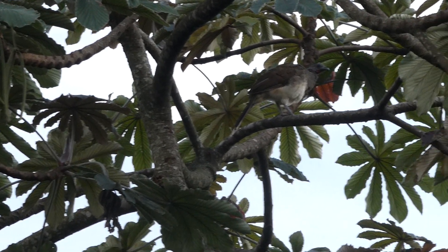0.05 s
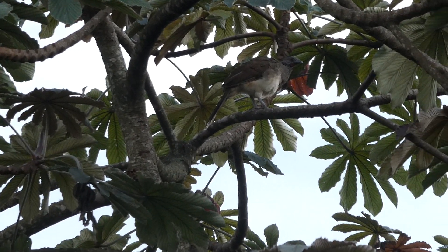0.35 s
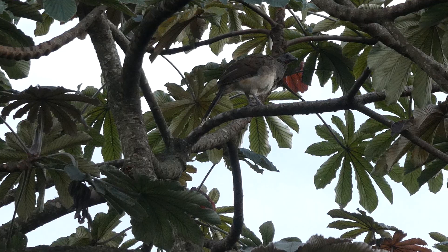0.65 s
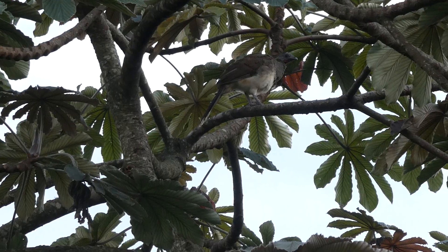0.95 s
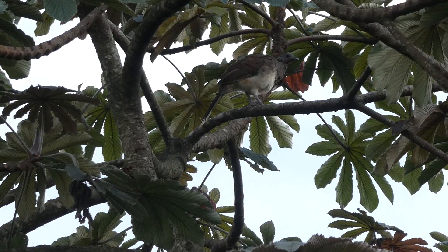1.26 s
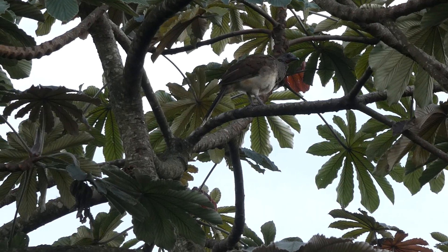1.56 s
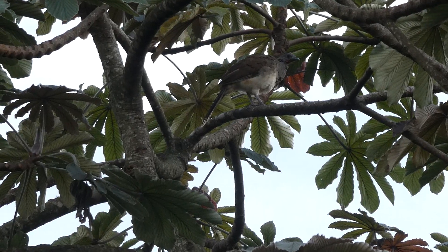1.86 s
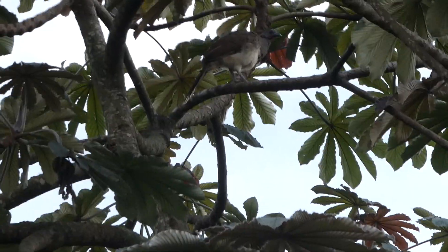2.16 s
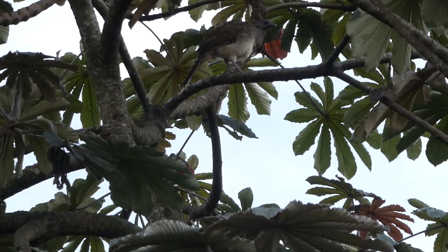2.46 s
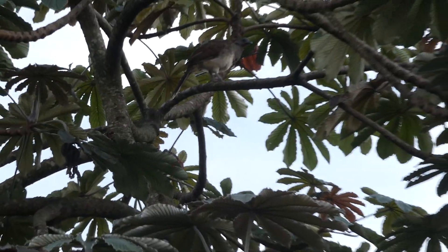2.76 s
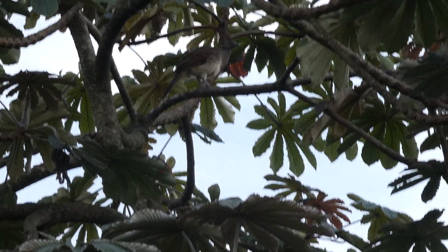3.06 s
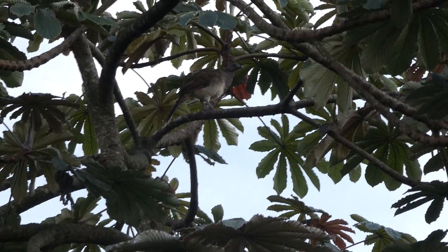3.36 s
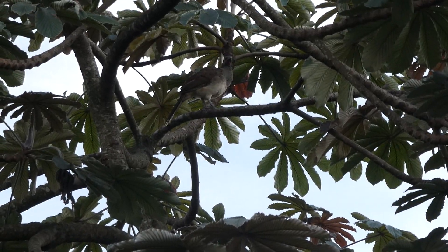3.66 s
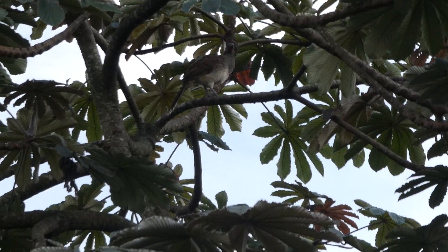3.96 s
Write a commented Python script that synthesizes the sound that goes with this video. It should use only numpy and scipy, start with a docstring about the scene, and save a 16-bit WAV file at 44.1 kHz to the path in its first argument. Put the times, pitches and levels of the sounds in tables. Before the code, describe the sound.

Chachalacas call in a leafy tree: one repeats squeaky whistles ending in harsh downward slurs while another adds short rasps. Leaves rustle now and then over distant rumble and hiss, and something clicks near the microphone at the end.

```python
"""Chachalacas in a leafy tree, heard in stereo over a low distant rumble and a hiss of air.
One bird opens with a short rasp and puts in more between and over another's ten calls. Each call starts
with a thin squeak, drops to a whistle, often long and sagging, and ends in a harsh downward slur; the
foliage scatters it. Early on a farther bird gives one thin note; then leaves rustle and twigs tick now
and then. Just before the end something clicks close to the microphone."""
import sys
import numpy as np
from scipy import signal
from scipy.io import wavfile

SR = 44100
rng = np.random.default_rng(int(sys.argv[2]) if len(sys.argv) > 2 else 0)


def file_out(sig):
    """Save sig as 16-bit WAV at sys.argv[1]."""
    # one column per channel
    cols = np.atleast_2d(sig).T
    # limit, then scale
    lim = np.clip(cols, -1, 1)
    pcm = np.round(lim * 32767).astype(np.int16)
    wavfile.write(sys.argv[1], SR, pcm)


N = 176400
T = np.arange(N) / SR

# body of each call: (time [s], length [s], top pitch [Hz], end pitch [Hz], sag exponent, scoop [Hz],
# fundamental [dB], octave [dB], third partial [dB], change of the fundamental over the note [dB],
# roughness, slur length [s], slur level [dB]); a higher sag exponent holds the pitch longer
WHISTLES = [(0.227, 0.23, 3500, 3206, 2.7, 162, -53, -46.5, -61, -1, 0.47, 0.051, -38),
            (0.649, 0.034, 2760, 2680, 1.52, 10, -61, -40, -59, 13, 0.43, 0.037, -42.5),
            (.864, 0.2, 3615, 3227, 1.6, 130, -49.5, -53, -66.5, -6, 0.584, .052, -44),
            (1.251, 0.038, 3310, 2977, 1.4, 3, -56, -48.5, -71, 4, 0.46, 0.064, -43),
            (1.488, 0.212, 3578, 3237, 1.7, 130, -52, -53.5, -69.5, 0, 0.55, 0.055, -42.5),
            (1.973, 0.24, 3650, 3285, 2.1, 136, -50, -53.5, -71, -8, 0.56, 0.049, -43),
            (2.409, .225, 3388, 3215, 1.6, 4, -55.5, -55.5, -73, 2, 0.53, .052, -44.5),
            (2.813, 0.039, 3449, 2945, 1.48, 3, -52, -51.5, -65, -4.5, 0.5, 0.056, -42.5),
            (3.077, .192, 3784, 3274, 1.3, 1, -41, -49.5, -64, -18, .39, 0.034, -40.5),
            (3.648, 0.17, 3790, 3220, 1.3, 0, -45, -51.5, -65.5, -15.5, 0.48, 0.024, -57)]
# start of each call: (time [s], length [s], first pitch [Hz], settled pitch [Hz], level [dB], roughness)
SQUEAKS = [(0.207, 0.028, 6460, 4880, -39, 1.23), (0.621, 0.034, 4980, 4360, -38.5, 0.48),
           (0.85, 0.026, 5353, 4610, -43, 0.7), (1.236, 0.032, 5270, 4550, -43.5, 0.8),
           (1.477, 0.048, 5400, 4620, -42.5, 0.7), (1.955, 0.0412, 5430, 4610, -43, 0.86),
           (2.355, 0.026, 4520, 4154, -49, 0.75), (2.790, 0.032, 4850, 4280, -38, 0.76),
           (3.028, 0.061, 4810, 4475, -36.5, 0.34), (3.593, 0.0226, 5950, 5200, -44.5, 0.92),
           (3.607, 0.05, 5020, 4570, -36.5, 0.52)]
# the second bird: (time [s], length [s], top pitch [Hz], level [dB], roughness)
RASPS = [(0.02, 0.076, 2352, -45.5, 0.55), (0.398, 0.057, 2410, -45.5, 0.89),
         (0.882, .105, 2301, -50.5, 1.13), (1.518, 0.1, 2298, -48, 1.42), (2.378, 0.089, 2414, -46, 1.2)]
# harmonics of each kind of note, from the fundamental up: (relative level [dB])
SLUR_PARTIALS_DB = [-20.5, -4, -10.5, -27, -33, -30.5, -52]
SQUEAK_PARTIALS_DB = [-3.5, -20, -38]
RASP_PARTIALS_DB = [-12, -1, -15.5, -22, -38]
# leaves and twigs: (time [s], decay [s], level [dB], low edge [Hz], high edge [Hz])
RUSTLES = [(0.836, 0.14, -44, 298, 5400), (.868, 0.035, -46.5, 302, 2210), (1.69, .006, -40, 1000, 3480),
           (2.49, 0.0038, -38, 890, 3500), (2.575, 0.0033, -52, 4000, 11000),
           (3.421, 0.0099, -44, 1370, 4440), (3.432, 0.0028, -42, 1200, 4200),
           (3.466, 0.0059, -50, 2000, 5350), (3.487, .006, -50, 1510, 4470)]
# ringing of the close click: (frequency [Hz], relative level [dB], time to fall 60 dB [s])
CLICK_MODES = [(1478, -0.5, 0.027), (1960, -6, 0.0178), (3620, -9, 0.027), (6500, -0.5, 0.0073),
               (7200, -1, .005), (10160, 2.5, .004), (13700, -5, .004)]
# colour of the distant rumble and the air: (frequency [Hz], relative density [dB])
RUMBLE_SPECTRUM = [(30, -37.5), (48, -19), (68, -13), (90, -12.5), (140, -9), (220, 1.5), (320, -3.5),
                   (480, -7.5), (800, -15.5), (1500, -26.5), (3000, -24), (15000, -82)]
AIR_SPECTRUM = [(30, -26), (500, 2.5), (1000, 7.5), (2000, -0.5), (4200, 1), (6000, -7.5), (8500, -11.5),
                (11000, -9), (15000, -32)]
# rise and fall of the rumble, the air and a far drone: (time [s], level [dB])
RUMBLE_LEVEL = [(0, -45.5), (.9, -46), (1.85, -45.5), (2.4, -46.5), (2.9, -49), (3.3, -47.5), (4, -49)]
AIR_LEVEL = [(0, -49.5), (.9, -51), (2.45, -50.5), (2.8, -54.5), (3.75, -52), (3.95, -57)]
DRONE_LEVEL = [(0, -54.5), (.5, -65), (.8, -54.5), (1.3, -56), (1.8, -72), (4, -57)]
# how alike the background is at the microphone's two sides: (frequency [Hz], correlation)
STEREO_LIKENESS = [(60, 0.38), (125, 0.55), (250, 0.474), (500, 0.126), (1000, 0.083), (4000, 0.69),
                   (8000, 0.49), (14000, 0.082)]

ATTACK_S, RELEASE_S = .0097, .00365   # every bird note's rise time and decay constant
TAIL_S = 4 * RELEASE_S


def whistles():
    """Main bird in the tree: the pitch scoops up, overshoots, sags, then collapses in a rough slur."""
    scoop_s, overshoot_s = .04385, .0394
    slur_end_hz, slur_rough, blend_s = 2030, 1.05, .014
    out = np.zeros(N)
    for (s, length, top_hz, end_hz, sag, scoop_hz, first_db, octave_db, third_db, change_db,
         rough, slur_s, slur_db) in WHISTLES:
        t = T[T < length + slur_s + TAIL_S]
        held, slur, harsh = np.clip([t / length, (t - length) / slur_s, (t - length) / blend_s], 0, 1)
        scoop = scoop_hz * np.exp(-t / scoop_s) * np.cos(np.pi * t / overshoot_s)
        whistle_hz = top_hz + (end_hz - top_hz) * held ** sag - scoop
        height = (1 - slur) ** 2.1
        hz = slur_end_hz + (whistle_hz - slur_end_hz) * height
        late_db = -14 * np.exp(-t / .0058)   # the fundamental speaks late
        clear = [first_db + late_db + change_db * held, octave_db, third_db, third_db - 8.5]
        clear += [-100] * (len(SLUR_PARTIALS_DB) - len(clear))
        # led by the octave, the slur swells as it falls
        slurred = slur_db - 4.5 * np.sqrt(height) + np.array(SLUR_PARTIALS_DB)[:, None]
        partials = [a + (b - a) * harsh for a, b in zip(clear, slurred)]
        add(out, s, syrinx(t, length + slur_s, hz, partials, rough + (slur_rough - rough) * harsh))
        turbulence = rms_one(band(rng.standard_normal(len(t)), 4300, 9150))
        add(out, s, from_db(slur_db - 10) * np.sin(np.pi * slur) * turbulence)
    return out


def squeaks(settle_s=.01398):
    """The main bird opens each call with a high, thin note that drops quickly and settles."""
    out = np.zeros(N)
    for s, length, first_hz, settled_hz, db, rough in SQUEAKS:
        t = T[T < length + TAIL_S]
        hz = settled_hz + (first_hz - settled_hz) * np.exp(-t / settle_s)
        add(out, s, syrinx(t, length, hz, db + np.array(SQUEAK_PARTIALS_DB), rough))
    return out


def rasps():
    """Second bird in the tree: hoarse arched notes with a strong octave and a rush of air."""
    out = np.zeros(N)
    for s, length, top_hz, db, rough in RASPS:
        t = T[T < length + TAIL_S]
        hz = top_hz * (1 - .3 * (t / length - .47) ** 2)
        half_order_db = -12.5 + 20 * np.log10(rough)   # a line under the octave grows with roughness
        partials = db + np.array([half_order_db, *RASP_PARTIALS_DB])
        add(out, s, syrinx(t, length, hz, partials, rough, orders=[1.5, 1, 2, 3, 4, 5]))
        turbulence = rms_one(band(rng.standard_normal(len(t)), 3460, 5700))
        add(out, s, from_db(db - 7.5) * np.sin(np.pi * t / t[-1]) * turbulence)
    return out


def far_bird(start_s=.715, length_s=.14):
    """One faint, slightly rising whistle from farther off."""
    out, t = np.zeros(N), T[T < length_s + TAIL_S]
    add(out, start_s, syrinx(t, length_s, hz=2780 + 1400 * t, partials_db=[-61 - 10 * t], rough=.35))
    return out


def syrinx(t, length, hz, partials_db, rough, orders=None):
    """A bird's voice: fluttering partials, each in a noise skirt that grows with roughness and order."""
    flutter = .04 * drift(t, 840) + .007 * drift(t, 110)
    phase = 2 * np.pi * np.cumsum(hz * (1 + rough * flutter)) / SR
    attack = np.sin(np.pi / 2 * np.clip(t / ATTACK_S, 0, 1)) ** 2
    release = np.exp(-np.maximum(t - length, 0) / RELEASE_S)
    out = 0
    for k, db in zip(orders or range(1, len(partials_db) + 1), partials_db):
        hoarse = .75 * rough * (1 + .34 * (k - 1))
        skirt = hoarse * (drift(t, 700) + 1j * drift(t, 700))
        shimmer_db = 2.2 * drift(t, 260)
        gain = from_db(db + shimmer_db) * np.sqrt(2 / (1 + hoarse ** 2))
        out = out + gain * np.imag((1 + skirt) * np.exp(1j * k * phase))
    return attack * release * out


def canopy(calls):
    """The calls reach the microphone direct and scattered by leaves, which soak up treble."""
    def scatter(db, t60_s, delay_s, top_hz):
        t = T[:SR]
        echoes = pair(rng.standard_normal((2, SR)), alike=.83) * from_db(-60 * t / t60_s) * (t > delay_s)
        echoes = band(rms_one(echoes) / np.sqrt(SR), 200, top_hz)
        return from_db(db) * signal.fftconvolve(calls[None], echoes)[:, :N]

    near_leaves = scatter(db=-3, t60_s=.072, delay_s=0, top_hz=17200)
    trees_around = scatter(db=-1, t60_s=.57, delay_s=.013, top_hz=7700)
    return calls + near_leaves + trees_around


def rustles():
    """Short dying bursts of crackle among the leaves and twigs."""
    out, t = np.zeros((2, N)), T[:SR // 4]
    for s, decay, db, low_hz, top_hz in RUSTLES:
        crackle = band(pair(rng.laplace(size=(2, len(t))), alike=.69), low_hz, top_hz)
        add(out, s, from_db(db) * rms_one(crackle) * np.exp(-t / decay))
    return out


def click(start_s=3.922, level_db=-32):
    """One small hard click close to the microphone, its modes dying fast."""
    out, t = np.zeros(N), T[:SR // 10]
    for hz, db, t60 in CLICK_MODES:
        add(out, start_s, from_db(level_db + db - 60 * t / t60) * np.sin(2 * np.pi * hz * t))
    return out


def background(drone_hz=208.7):
    """Rumble and a faint drone in the distance, a touch to the right, with airy hiss all around."""
    drone = level(DRONE_LEVEL) * np.sqrt(2) * np.sin(2 * np.pi * drone_hz * T + .78 * drift(T, 9))
    rumble = level(RUMBLE_LEVEL) * banded_noise(RUMBLE_SPECTRUM, waver_db=2)
    air = level(AIR_LEVEL) * banded_noise(AIR_SPECTRUM, waver_db=3.5)
    return (rumble + drone) * pan(-.6) + air


def banded_noise(spectrum, waver_db):
    """Half-octave bands of stereo noise, each wavering on its own; rms 1."""
    out, edges = 0, 28 * 2 ** np.arange(0, 9.6, .5)
    white = rng.standard_normal((2, 2, N))
    for k, (low, high) in enumerate(zip(edges, edges[1:])):
        hz = np.sqrt(low * high)
        gain = from_db(at_hz(spectrum, hz) + waver_db * drift(T, 14))
        out = out + gain * pair(band(white[k % 2], low, high), at_hz(STEREO_LIKENESS, hz))
    return rms_one(out)


def from_db(db):
    """Decibels to gain."""
    return 10 ** (np.asarray(db) / 20)


def rms_one(x):
    """Scale to unit rms."""
    return x / np.sqrt(np.mean(x ** 2) + 1e-20)


def level(rows):
    """Gain along a (time [s], level [dB]) curve."""
    return from_db(np.interp(T, *np.transpose(rows)))


def at_hz(rows, hz):
    """Read a table on a log-frequency axis."""
    frequencies, values = np.transpose(rows)
    return np.interp(np.log(hz), np.log(frequencies), values)


def pan(db):
    """Left and right gains; positive leans left."""
    return from_db([[db], [-db]])


def drift(t, per_s):
    """Random wander through per_s fresh values a second."""
    return np.interp(t * per_s, np.arange(2048), rng.standard_normal(2048))


def pair(noise, alike):
    """Two unrelated noises as mid and side, giving a left and right of given correlation."""
    mid = np.sqrt((1 + alike) / 2) * noise[0]
    side = np.sqrt((1 - alike) / 2) * noise[1]
    return np.array([mid + side, mid - side])


def band(x, low_hz, high_hz):
    """Gentle band-pass."""
    return signal.sosfilt(signal.butter(2, [low_hz, high_hz], "band", fs=SR, output="sos"), x)


def add(out, s, x):
    """Mix a sound in at its time."""
    i = int(s * SR)
    out[..., i:i + x.shape[-1]] += x[..., :N - i]


def scene():
    """At the microphone: birds in the canopy a touch to the left, leaves, a click and the background."""
    beak_dip = signal.iirnotch(8380, Q=2.32, fs=SR)
    birds = signal.lfilter(*beak_dip, squeaks() + whistles() + rasps() + far_bird())
    return canopy(birds) * pan(.58) + rustles() + click() + background()


def record(dry):
    """The recorder cuts the deep bass and the top."""
    low_cut = signal.butter(4, 58, "high", fs=SR, output="sos")
    high_cut = signal.ellip(10, .1, 80, 15100, fs=SR, output="sos")
    return signal.sosfilt(high_cut, signal.sosfilt(low_cut, dry))


dry = scene()
out = record(dry)
file_out(out)
```